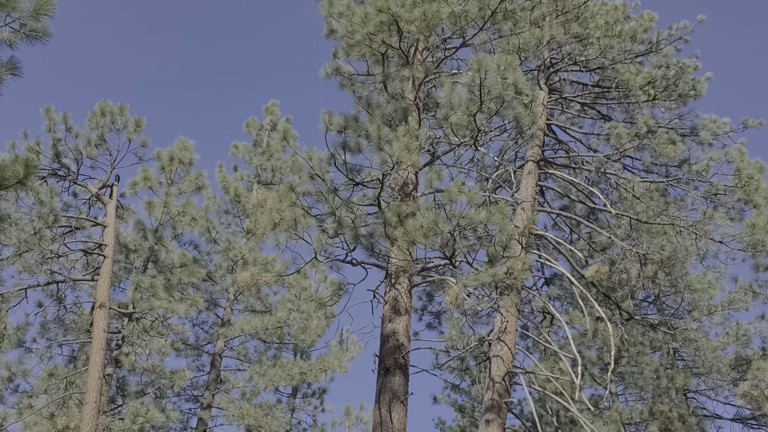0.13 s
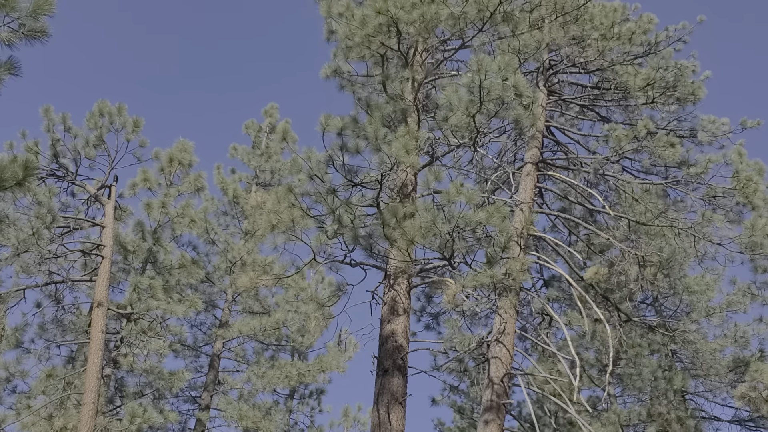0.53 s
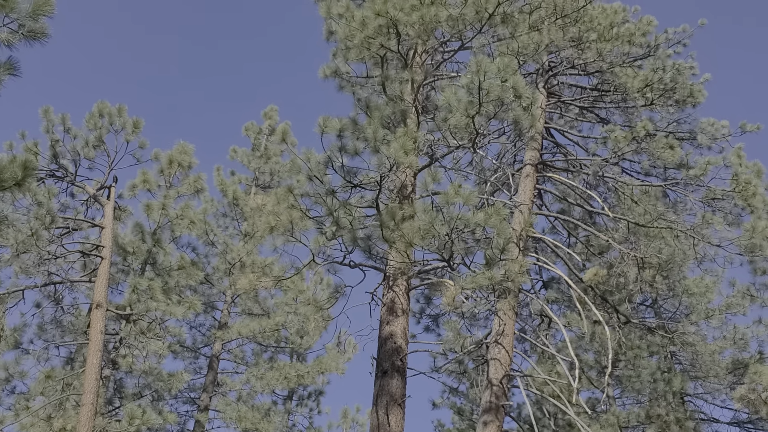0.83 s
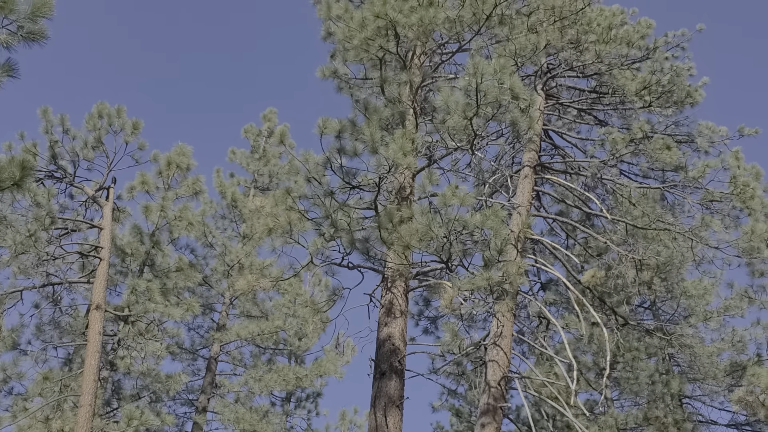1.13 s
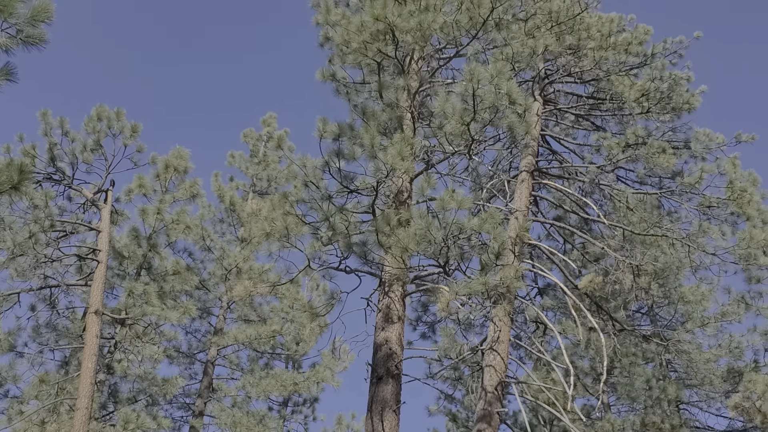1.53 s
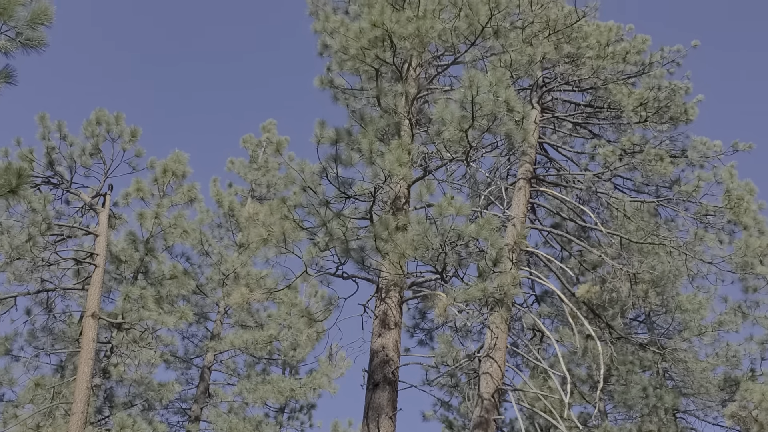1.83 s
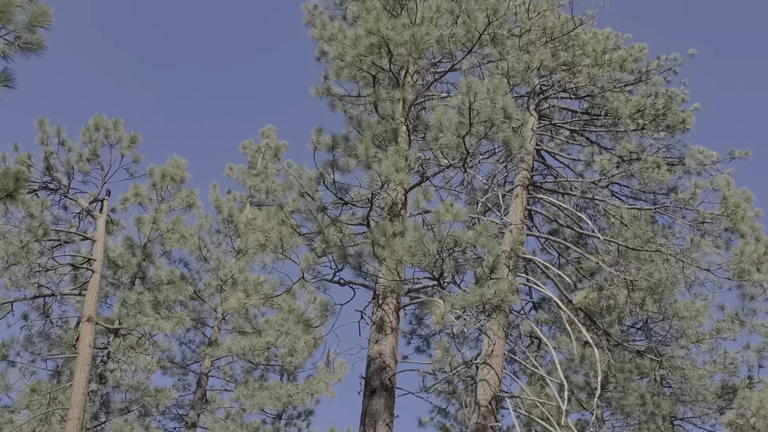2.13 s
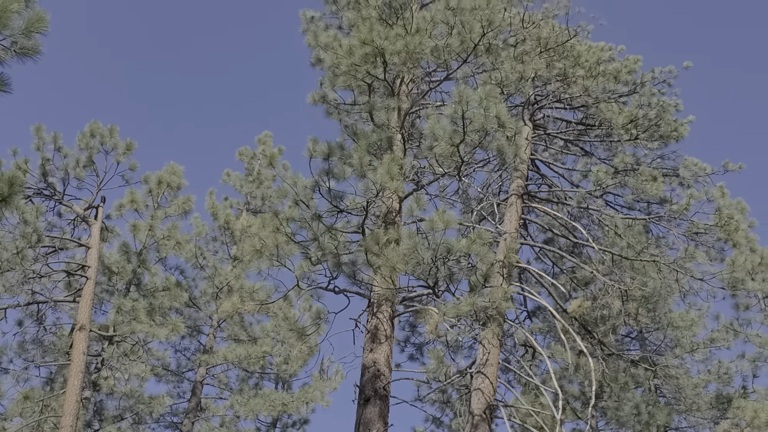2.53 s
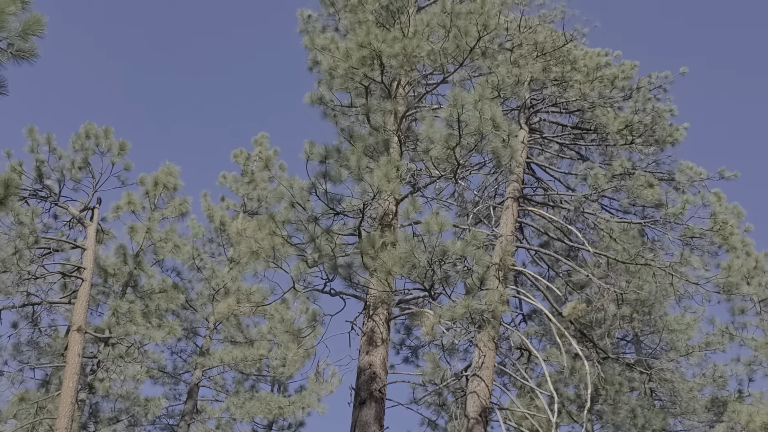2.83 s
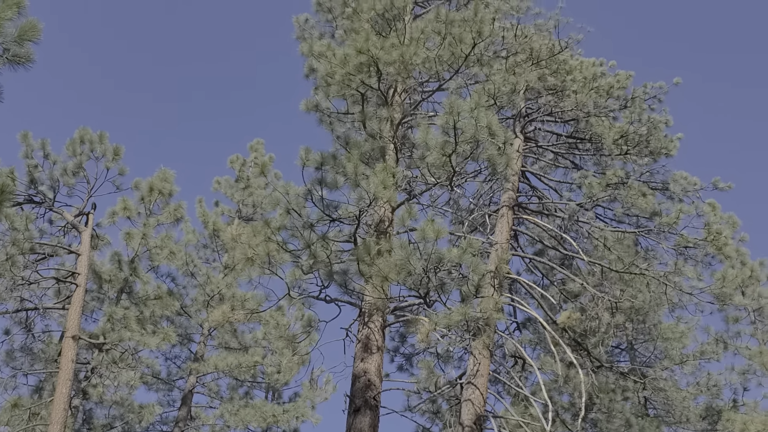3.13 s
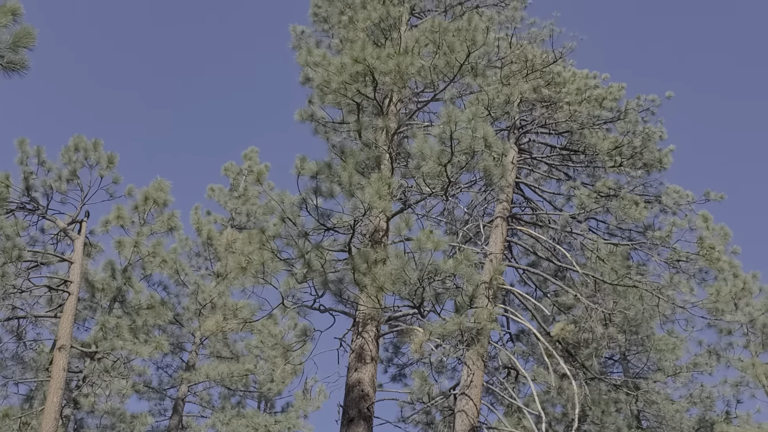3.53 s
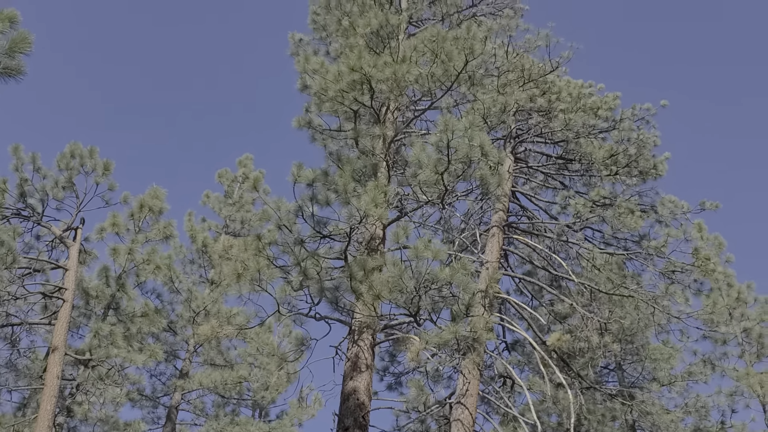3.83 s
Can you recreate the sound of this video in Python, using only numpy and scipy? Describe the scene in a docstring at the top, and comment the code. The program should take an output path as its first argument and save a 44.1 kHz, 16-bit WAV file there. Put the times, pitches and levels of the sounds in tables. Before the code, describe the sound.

Gusty wind batters the left side of a stereo microphone in a pine forest with low rumble and dull pops, then suddenly eases, leaving a soft airy roar of treetops, light needle hiss and small faint puffs.

```python
"""Wind in tall pines

Wind roars softly in the crowns of tall pines; later the needles of a nearer tree hiss, leaning left:
both are shaped noise whose bands swell independently. Gusts buffet two microphone ports, the left far
harder, as low-passed turbulence and pressure spikes; the air there drops abruptly at 2.36 s and leaves
only small puffs. A faint, peaky recorder hiss lies underneath as coloured noise.
"""
import sys
import numpy as np
from scipy import signal
from scipy.fft import rfft, irfft
from scipy.io import wavfile
from scipy.ndimage import uniform_filter1d

SR = 44100
rng = np.random.default_rng(int(sys.argv[2]) if len(sys.argv) > 2 else 0)


def transcribe(u):
    """Save the signal u as a 16-bit wav file named by the first command-line argument.

    u: samples, shape (n,) or (channels, n), limited to [-1, 1]; the rate is SR.
    q: integer samples, one column per channel.
    """
    v = np.clip(np.atleast_2d(u).T, -1, 1)
    q = np.round(v * 32767).astype(np.int16)
    wavfile.write(sys.argv[1], SR, q)


N = 176400   # 4 s
HZ = np.maximum(np.arange(N // 2 + 1) * SR / N, 1)   # rfft bins, floored at 1 Hz

# Crown wind strength, before ROAR_GAIN_DB: [t/s, level/dB]
CROWN_WIND = [(0, -58.5), (.2, -57.5), (.6, -60), (1.3, -60), (1.8, -58.5), (2.25, -57), (2.36, -58),
              (2.41, -64.5), (2.57, -60.5), (2.85, -62.5), (3.1, -62.5), (3.27, -61), (3.66, -63),
              (3.95, -59.5)]
# Crown roar spectrum, relative: [f/Hz, density/dB per Hz]
ROAR_SPECTRUM = [(60, -17), (200, -8.5), (320, -4.5), (450, -3), (630, -0.5), (870, -5.5), (1100, -6.5),
                 (1400, -12), (1700, -14.5), (1950, -25), (2300, -27), (2750, -36), (4000, -40.5),
                 (7000, -64)]
# Roar balance, up on the left and down on the right: [f/Hz, level/dB]
ROAR_PAN = [(300, 0), (800, 0.7), (2500, 2)]
# Left-right correlation of foliage noise: [f/Hz, correlation]
STEREO_LIKENESS = [(200, 1), (600, 0.69), (860, 0.29), (1150, .52), (1650, 0.24), (2100, .1), (4000, 0)]
# Near-needle wind strength: [t/s, level/dB]
NEEDLE_WIND = [(0, -82), (1.4, -85), (2.1, -74.5), (2.4, -73), (2.55, -67.5), (2.8, -65.5), (3.3, -66),
               (3.7, -66), (4, -67.5)]
# Needle hiss spectrum, relative: [f/Hz, density/dB per Hz]
NEEDLE_SPECTRUM = [(800, -3), (1300, 2.5), (1680, 11), (2000, 5), (2500, 1.5), (2800, -4.5), (3200, -3.1),
                   (4000, -5.5), (5100, -11.5), (6000, -14.5), (6700, -20), (7200, -48.5)]
# Needle balance, up on the left and down on the right: [f/Hz, level/dB]
NEEDLE_PAN = [(1700, -1), (2800, 4), (4000, 4), (6000, 8.5)]
# Turbulent pressure spectrum at a port, relative: [f/Hz, density/dB per Hz]
TURBULENCE_SPECTRUM = [(25, -13.5), (40, -5), (52, 0.5), (85, 1), (120, -4.5), (185, -7.5), (300, -12.5),
                       (450, -12), (1500, -30.5)]
# Steady buffeting of each port, before the low cut: [t/s, level/dB]
FLOW_LEFT = [(0, -25.5), (.2, -24.5), (.29, -31.5), (0.451, -22.5), (0.751, -28), (0.949, -29.5),
             (1.25, -25.5), (1.702, -25), (1.8, -28.5), (1.86, -36), (1.93, -28.5), (2.1, -22),
             (2.353, -23), (2.385, -78.5), (2.8, -57), (2.95, -93), (3.15, -88), (3.5, -54), (3.63, -72),
             (3.75, -56), (4, -59)]
FLOW_RIGHT = [(0, -28), (.1, -65), (.3, -31), (.44, -46), (.8, -42.5), (1.3, -44), (1.6, -45.5),
              (2.3, -42.5), (2.4, -52.5), (2.85, -52.5), (3.1, -53), (3.4, -56), (3.6, -64), (3.75, -59),
              (4, -50.5)]
# Low-pass corner of steady buffeting: [left f/Hz, right f/Hz]
FLOW_CORNER_HZ = [200.3, 130]
# Gusts, levels before swell weighting and low cut, corner for the left port:
# [centre t/s, length/s, left level/dB, right level/dB, corner f/Hz]
GUSTS = [(0.103, 0.057, -32.5, -49, 310), (0.164, 0.028, -29, -33, 420), (.23, .10, -33, -33, 300),
         (.372, .10, -17.5, -37, 257), (0.504, 0.045, -26.5, -24.5, 179), (0.548, .07, -14, -26, 96.6),
         (.655, .06, -19.5, -43.5, 85), (0.708, 0.077, -19.5, -31, 238), (0.84, 0.055, -17, -47, 148),
         (1.054, 0.044, -17.5, -40, 130), (1.329, 0.085, -24, -44, 160), (1.48, .08, -34, -29.5, 235),
         (1.618, .05, -20.5, -61, 278), (1.702, .04, -22.5, -47, 227), (1.74, 0.0404, -22.5, -49, 193),
         (1.805, .06, -33, -32.5, 110), (1.897, 0.049, -25.5, -39.5, 124), (2.073, 0.03195, -24, -49, 334),
         (2.163, .09, -21, -43, 403), (2.216, .05, -22.5, -37, 280), (2.293, .06, -32, -29.5, 400),
         (2.339, .03, -23.5, -41, 370), (2.465, .07, -48, -35.5, 363), (2.555, 0.084, -36, -30, 108),
         (2.669, 0.0457, -36, -37, 92), (2.801, 0.034, -45, -39.5, 101), (3.207, 0.046, -49, -45, 110),
         (3.708, 0.07, -54, -48.5, 101)]
# Sharp eddies on the left port, before the low cut: [t/s, peak level/dB, width/s]
POPS = [(0.095, -12.5, 0.00082), (.373, -6, 0.0013), (.395, -9.5, 0.00092), (0.567, -8, 0.0014),
        (0.864, -15, 0.00075), (0.875, -6.5, 0.0018), (1.493, -13, 0.0011), (1.615, -14, .001),
        (2.078, -11.5, 0.0006), (2.134, -6.5, 0.0012), (2.154, -17, .0005), (2.184, -18, 0.0006),
        (2.222, -11.5, 0.0011), (2.305, -13, 0.0009), (2.353, -12, 0.00055)]
# Recorder hiss of each channel, before HISS_TREND: [f/Hz, density/dB per Hz]
HISS_LEFT = [(2000, -119), (4600, -120), (5200, -112), (5500, -104.5), (6100, -101.3), (6500, -104),
             (6900, -111), (7150, -130), (7600, -129), (8200, -124), (8800, -121), (9100, -115),
             (9500, -114.3), (9950, -117), (10250, -125), (12500, -121.3), (15500, -122.3)]
HISS_RIGHT = [(2000, -118), (3500, -119), (4500, -122), (5600, -128), (8300, -130), (11000, -126),
              (15500, -125)]
# Narrow hiss hump, opposite polarity in the channels, before HISS_TREND: [f/Hz, density/dB per Hz]
HISS_SHARED = [(4400, -135), (4850, -118), (5150, -117), (5600, -135), (7000, -160)]
# Hiss gain over time: [t/s, level/dB]
HISS_TREND = [(0, 2.4), (1.5, 0), (2.3, 1.8), (2.45, -1), (4, -1.6)]

ROAR_GAIN_DB, ROAR_PATCHY_DB, ROAR_FLUTTER_HZ = 7, 1.48, 19
NEEDLE_PATCHY_DB, NEEDLE_FLUTTER_HZ = 1.5, 1.7
EDDY_SPLIT_HZ, EDDY_LUMP_HZ = 126, 51
LARGE_ROUGH_DB, SMALL_ROUGH_DB = 3, 6
FLOW_EVEN_S = 0.062   # averaging time that evens out the steady flow
RIGHT_CORNER_RATIO = 0.83   # the sheltered right port sounds duller
POP_TROUGH_RATIO = 2.5   # trough width / spike width
PORT_LOW_CUT_HZ, TOP_CUT_HZ = 38.5, 15750


def from_db(db):
    """Decibels to gain."""
    return 10 ** (np.asarray(db) / 20)


def rms_one(x):
    """Scale to unit rms."""
    return x / np.sqrt(np.mean(x ** 2) + 1e-20)


def in_time(rows):
    """Interpolate a table at every sample."""
    return np.interp(np.arange(N) / SR, *np.transpose(rows))


def at_hz(rows):
    """Interpolate a table at every bin, over log frequency."""
    hz, value = np.transpose(rows)
    return np.interp(np.log(HZ), np.log(hz), value)


def low_pass(x, corner_hz):
    """Causal third-order Butterworth low-pass."""
    return signal.sosfilt(signal.butter(3, corner_hz, "low", fs=SR, output="sos"), x)


def drift(corner_hz):
    """Random fluctuation of unit rms, mostly below corner_hz."""
    noise = rfft(rng.standard_normal(N))
    return rms_one(irfft(noise / (1 + (HZ / corner_hz) ** 2), N))


def add(out, centre_s, sound):
    """Mix in a sound centred on centre_s."""
    length = sound.shape[-1]
    at = int(centre_s * SR) - length // 2 + np.arange(length)
    inside = (at >= 0) & (at < N)
    out[..., at[inside]] += sound[..., inside]


def foliage(spectrum, balance, patchy_db, flutter_hz):
    """Countless needles shedding vortices: stereo noise whose bands swell independently."""
    mid, side = rfft(rng.standard_normal((2, N)))
    alike = np.clip(at_hz(STEREO_LIKENESS), -1, 1)
    stereo = np.sqrt(1 + alike) * mid + np.sqrt(1 - alike) * side * [[1], [-1]]
    pan = from_db(at_hz(balance) * [[1], [-1]])
    air = from_db(at_hz(spectrum)) * pan * stereo
    centres_hz = np.geomspace(250, 6000, 10)
    total = np.zeros((2, N))
    for one_band in np.eye(len(centres_hz)):
        share = np.interp(np.log(HZ), np.log(centres_hz), one_band)   # overlapping triangles
        total += irfft(air * share, N) * from_db(patchy_db * drift(flutter_hz))
    return rms_one(total)


def crown_roar():
    """Far crowns: many vortex sounds merge into a roar that follows the wind."""
    roar = foliage(ROAR_SPECTRUM, ROAR_PAN, ROAR_PATCHY_DB, ROAR_FLUTTER_HZ)
    return from_db(in_time(CROWN_WIND) + ROAR_GAIN_DB) * roar


def eddies():
    """Turbulent pressure at one port; small eddies bunch up more than large ones."""
    air = rfft(rng.standard_normal(N)) * from_db(at_hz(TURBULENCE_SPECTRUM)) * (HZ > 18)
    lumps = drift(EDDY_LUMP_HZ)
    large_share = 1 / (1 + (HZ / EDDY_SPLIT_HZ) ** 4)
    large = irfft(air * large_share, N) * rms_one(from_db(LARGE_ROUGH_DB * lumps))
    small = irfft(air * (1 - large_share), N) * rms_one(from_db(SMALL_ROUGH_DB * lumps))
    return large + small


def rumble(flow, corner_hz):
    """Steady buffeting of one port: low-passed turbulence, evened out, then set by the flow."""
    x = low_pass(eddies(), corner_hz)
    power = uniform_filter1d(x * x, int(FLOW_EVEN_S * SR))
    return from_db(in_time(flow)) * x / np.sqrt(power + 1e-14)


def hiss():
    """Recorder noise: coloured noise with treble humps, strongest on the left."""
    density_db = [at_hz(HISS_LEFT), at_hz(HISS_RIGHT), at_hz(HISS_SHARED)]
    colour = from_db(density_db) * np.sqrt(SR / 2)   # density to white-noise gain
    left, right, shared = irfft(rfft(rng.standard_normal((3, N))) * colour, N)
    return np.array([left + shared, right - shared]) * from_db(in_time(HISS_TREND))


def gusts():
    """Turbulence swells and fades on both ports; smaller eddies pass a higher corner, hence brighter."""
    out = np.zeros((2, N))
    pressure = np.array([eddies(), eddies()])
    for centre_s, length_s, left_db, right_db, corner_hz in GUSTS:
        swell = np.hanning(int(length_s * SR)) ** 0.47
        at = int(centre_s * SR) + np.arange(len(swell))
        air = np.take(pressure, at, axis=1, mode="wrap")
        left = rms_one(low_pass(air[0], corner_hz) * swell)
        right = rms_one(low_pass(air[1], corner_hz * RIGHT_CORNER_RATIO) * swell)
        burst = np.array([left, right]) * from_db([[left_db], [right_db]])
        add(out, centre_s, burst * swell.mean())
    return out


def pops():
    """A small fast eddy gives the left port one pressure spike between two troughs."""
    out = np.zeros(N)
    t = np.arange(-SR // 50, SR // 50) / SR
    for centre_s, peak_db, width_s in POPS:
        u = t / width_s
        spike = np.exp(-u ** 2 / 2)
        trough = np.exp(-(u / POP_TROUGH_RATIO) ** 2 / 2) / POP_TROUGH_RATIO
        add(out, centre_s, from_db(peak_db) * (spike - trough) / (1 - 1 / POP_TROUGH_RATIO))
    return out * [[1], [0]]


def needle_hiss():
    """Near needles: vortex noise, brighter than the roar, follows its own wind."""
    needles = foliage(NEEDLE_SPECTRUM, NEEDLE_PAN, NEEDLE_PATCHY_DB, NEEDLE_FLUTTER_HZ)
    return from_db(in_time(NEEDLE_WIND)) * needles


def port_low_cut(x):
    """The microphone's low cut, applied to port pressure."""
    return irfft(rfft(x) / np.sqrt(1 + (PORT_LOW_CUT_HZ / HZ) ** 8), N)


def scene():
    """Trees, low-cut wind on the ports, and hiss."""
    left_hz, right_hz = FLOW_CORNER_HZ
    steady = np.array([rumble(FLOW_LEFT, left_hz), rumble(FLOW_RIGHT, right_hz)])
    buffeting = port_low_cut(steady + gusts() + pops())
    return crown_roar() + needle_hiss() + buffeting + hiss()


def record(dry):
    """Cut the top steeply."""
    return irfft(rfft(dry) / np.sqrt(1 + (HZ / TOP_CUT_HZ) ** 700), N)


dry = scene()
out = record(dry)
transcribe(out)
```